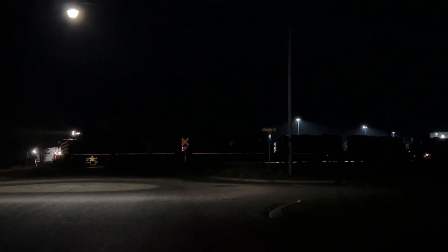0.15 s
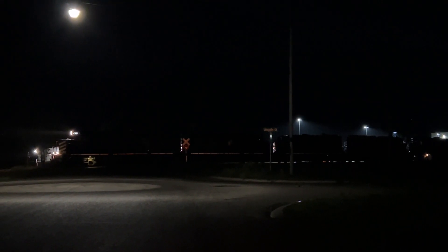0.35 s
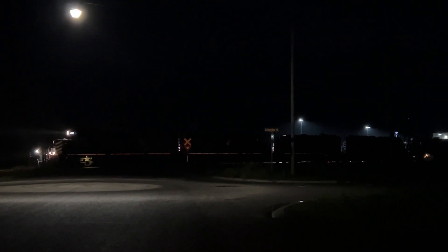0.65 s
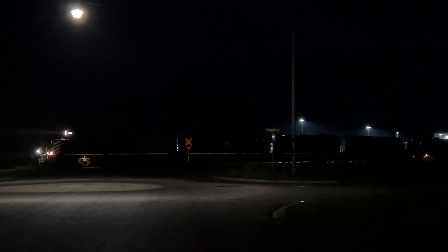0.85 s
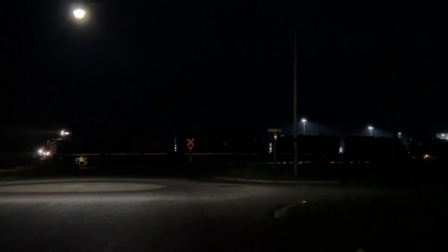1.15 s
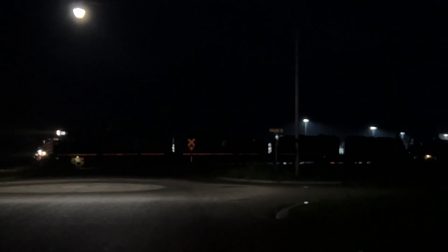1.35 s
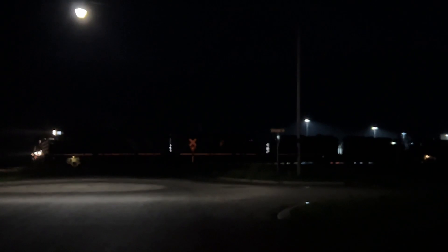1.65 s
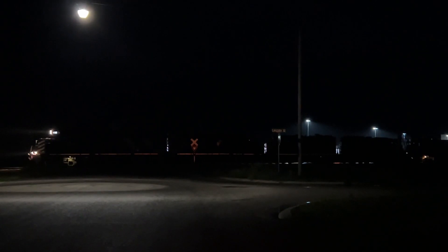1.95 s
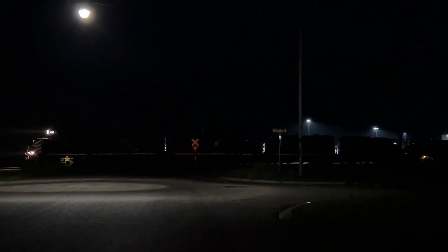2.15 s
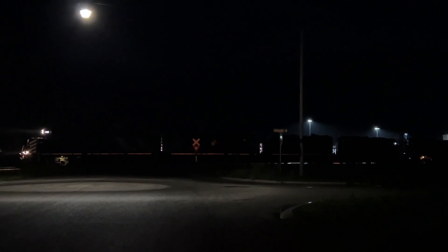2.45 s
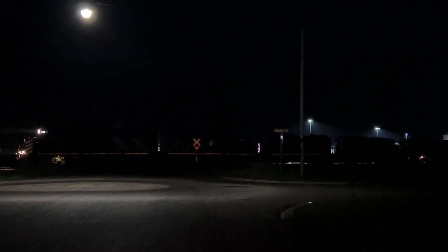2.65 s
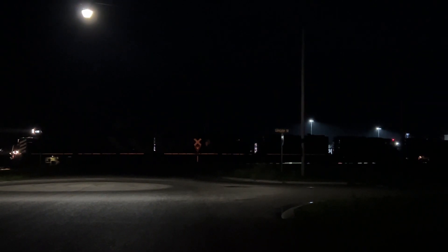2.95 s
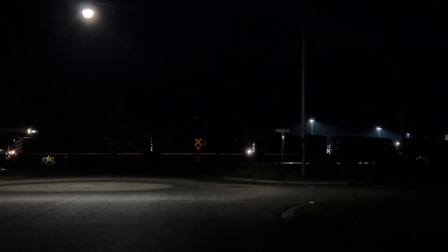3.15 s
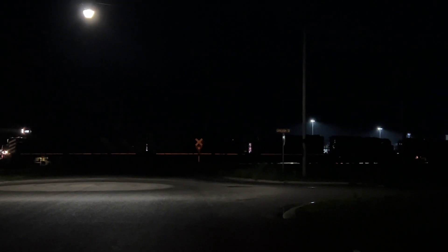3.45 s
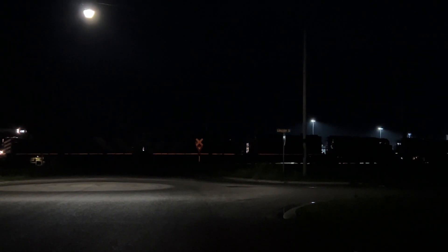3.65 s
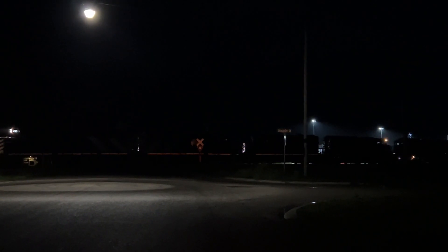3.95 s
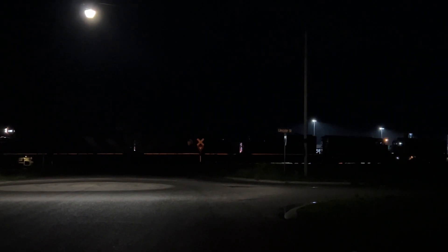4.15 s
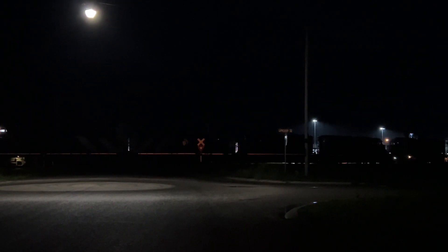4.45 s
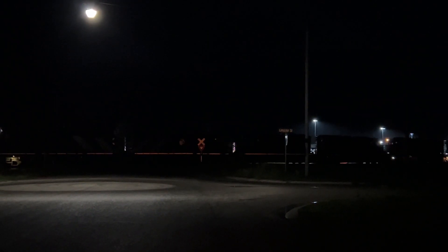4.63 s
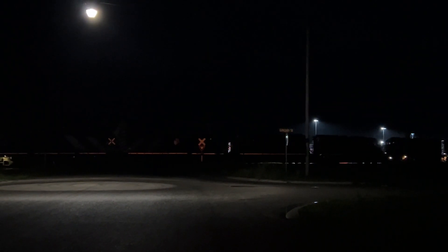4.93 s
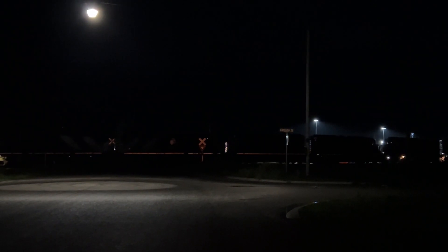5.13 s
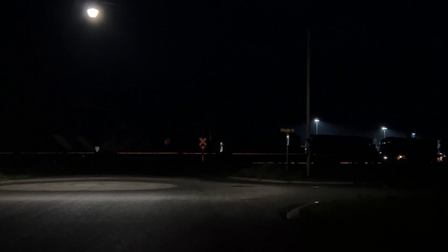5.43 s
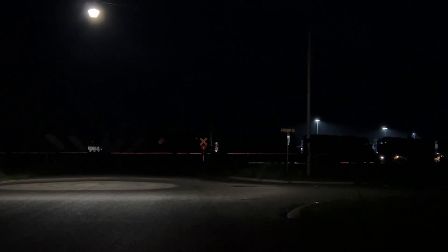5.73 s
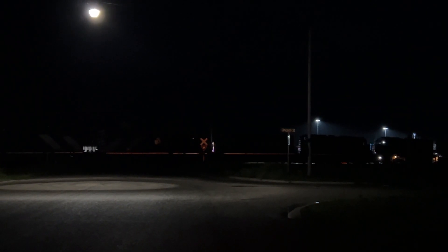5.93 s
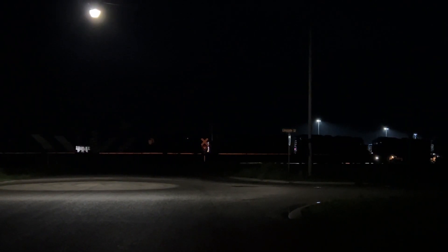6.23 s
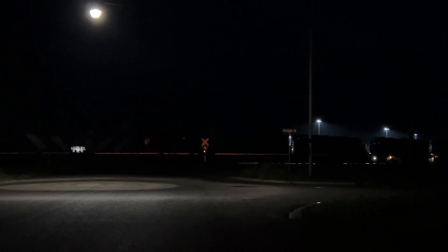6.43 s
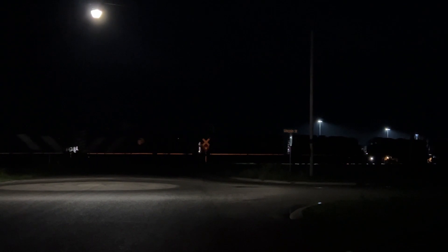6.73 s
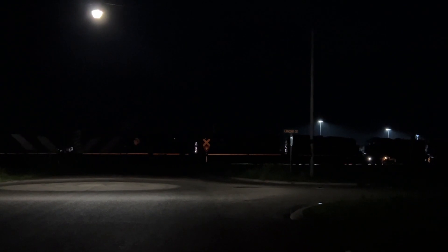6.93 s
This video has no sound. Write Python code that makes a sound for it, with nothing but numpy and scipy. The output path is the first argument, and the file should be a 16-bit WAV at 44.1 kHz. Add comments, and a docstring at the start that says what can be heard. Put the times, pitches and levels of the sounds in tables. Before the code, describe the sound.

A freight train passes over a night-time road crossing, heard in the open from some distance by a phone in nearly centred stereo. From 0 to about 4 s two diesel locomotives pull under load; their deep, uneven exhausts pulse around eight cycles a second and slowly beat against each other. Above them lie a wavering hum, fluttering gear whine, faint whistles and a noisy, airy blower whine near 6 to 7 kHz. Rail rumble, midrange roar and hiss flicker throughout. Soft, short wheel knocks come near 1.1, 2.3, 4.9 and 5.8 s. At about 4.4 s the throttle closes: every engine pitch sags steadily, by over a quarter by the end, and the exhausts thin and die away, while gear whine flickers through and low thudding strengthens around 5.6 s. The hiss eases after 6 s. From about 6.5 s a steady low drone near 88 Hz swells until the end at 7 s.

```python
"""Two coupled diesel locomotives pull a freight train over a crossing at night, some way from a phone.
At first their uneven exhausts throb and beat against each other under load, with gear and blower whine.
Wheels roar on the rails all along, as flickering noise, and four times knock over a joint.
After about four seconds the throttle closes: every engine pitch sags and the exhausts die away.
Near the end a low steady drone swells."""
import sys
import numpy as np
from scipy import signal
from scipy.fft import rfft, irfft
from scipy.io import wavfile
from scipy.ndimage import uniform_filter1d

SR = 44100
rng = np.random.default_rng(int(sys.argv[2]) if len(sys.argv) > 2 else 0)


def master(y):
    """Save y as 16-bit WAV."""
    cut = np.clip(np.atleast_2d(y).T, -1, 1)
    pcm = np.round(cut * 32767)  # scale
    wavfile.write(sys.argv[1], SR, pcm.astype(np.int16))


N = 312228  # samples, 7.08 s

LEAD_CRANK, TRAIL_CRANK = -.030, -.040  # engine cycles at the start


def undb(db):
    """Decibels to an amplitude factor."""
    return 10 ** (np.asarray(db) / 20)


def level(x, db):
    """Scale a signal to an rms level in dB."""
    return x * undb(db) / np.sqrt(np.mean(x ** 2))


def curves(table):
    """Columns after the time column, as one value per sample."""
    s, *columns = np.transpose(table)
    return [np.interp(np.arange(N) / SR, s, c) for c in columns]


def curve(table):
    """The first column after the time column, as one value per sample."""
    return curves(table)[0]


def along(table, x):
    """A table of (frequency or order, dB) read on a log axis."""
    return np.interp(np.log(x), np.log(np.array(table)[:, 0]), np.array(table)[:, 1])


def walk(rate):
    """Random levels held 1 / rate s and slewed twice; spread near 1."""
    hold = int(SR / rate)
    steps = np.repeat(rng.standard_normal(N // hold + 1), hold)
    slewed = uniform_filter1d(uniform_filter1d(steps, hold), hold)
    return 1.66 * slewed[:N]


def sine(hz):
    """A sine of moving pitch; rms 1."""
    return np.sqrt(2) * np.sin(2 * np.pi * np.cumsum(hz) / SR)


def smooth_noise(width_hz):
    """Complex noise that wanders within a band around zero."""
    sos = signal.butter(2, width_hz / 2, fs=SR, output="sos")
    re, im = signal.sosfilt(sos, rng.standard_normal((2, N)))
    return level(re, 0) + 1j * level(im, 0)


def smear(hz, width_hz):
    """A band of noise around a moving centre; rms near 1."""
    return (smooth_noise(width_hz) * np.exp(2j * np.pi * np.cumsum(hz) / SR)).real


def tone(hz, db, waver_db, skirt_db, skirt_share, rate=12.0):
    """A wavering sine; its scattered echoes come back lower, as a skirt of noise just under it."""
    clean = undb(waver_db * walk(rate)) * sine(hz)
    skirt = smear((1 - skirt_share / 2) * hz, skirt_share * hz[0])
    return undb(db) * clean + undb(skirt_db) * skirt


def colour(spectrum, flicker_db, rate, count):
    """Noise of a given spectrum, cut in bands that each flicker alone; rms 1."""
    hz = np.fft.rfftfreq(N, 1 / SR).clip(1)
    full = rfft(rng.standard_normal(N)) * undb(along(spectrum, hz))
    edges = np.geomspace(spectrum[0][0], spectrum[-1][0], count + 1)
    total = 0
    for low, high in zip(edges, edges[1:]):
        band = irfft(full * (hz >= low) * (hz < high), N)
        total = total + band * undb(flicker_db * walk(rate))
    return level(total, 0)


def exhaust(hz, load, cylinders, crank, upper, throb_db):
    """Unequal cylinders repeat once a cycle; the silencer passes mostly the middle orders of that pattern."""
    # what the silencer passes: order (per engine cycle), gain_db
    silencer = [(5, -28), (6, -19.5), (7, -15.5), (8, 2), (15, 4)]
    # with the fuel cut two orders linger above the rest: time_s, order_8_db, order_13_db
    linger = [(0, -0.5, -1), (5.4, 1, 0), (5.8, 3.5, 3.5), (6.2, 4.5, 11), (6.6, 3, 3), (7.08, 11, 11.5)]
    # upper orders against the exhaust: time_s, level_db
    upper_level = [(0, -1.5), (1, -3), (2, -2), (3, -0.9), (3.9, -1), (4.4, 0), (4.8, 4), (5.5, 2.5),
                   (6.2, 1.5), (7.08, 1.5)]
    pipe_spread_orders = 11  # the pipe delays the edge by one cycle over this many orders

    load_db, bright_db = curves(load)
    linger_db = dict(zip((8, 13), curves(linger)))
    turn = np.exp(2j * np.pi * (crank + np.cumsum(hz) / SR))
    pattern = np.fft.fft(cylinders)
    pattern = pattern * np.sqrt(2 / np.sum(np.abs(pattern[8:]) ** 2))

    body, spin = 0, turn ** 4
    for order in range(5, 16):
        spin = spin * turn
        gain_db = along(silencer, order) + bright_db * max(order - 8, 0) + linger_db.get(order, 0)
        body = body + undb(gain_db) * (pattern[order] * spin).real

    edge = 0  # the sharp edge of each puff
    for order, order_db in enumerate(upper, 16):
        spin = spin * turn
        pipe_delay = np.exp(-1j * np.pi * order ** 2 / pipe_spread_orders)
        edge = edge + undb(order_db) * (spin * pipe_delay).real
    edge_db = curve(upper_level) + throb_db + .5 * walk(6)
    return undb(load_db) * (body + undb(edge_db) * edge)


def throb(hz):
    """Level swing in dB of what the trailing engine shakes, repeating once an engine cycle."""
    # swing in sixteenths of the cycle: swing_db
    cycle_swing = [2, 2, 3.5, 2.5, -2, .5, 0, -1.5, -4, -3, -4, -3, -1.5, 0, 0, 1]
    # how much of the swing is heard: time_s, share (0-1)
    swing_depth = [(0, 0.76), (5.4, 0.94), (6, 0.21), (7.08, .3)]
    turn = TRAIL_CRANK + np.cumsum(hz) / SR
    return curve(swing_depth) * np.interp(turn, (np.arange(16) + .5) / 16, cycle_swing, period=1)


def engines(lead_hz, trail_hz, throb_db):
    """Two exhausts of slightly different speed beat against each other."""
    # each cylinder's puff against the mean, in firing order: puff (share of the largest)
    lead_cylinders = [-0.09, -0.39, -0.12, 0.2, -0.06, -0.6, 0.62, -0.73, 1.0, -0.26, 0.25, -0.2, 0.18,
                      0.37, 0.24, -0.41]
    trail_cylinders = [0.61, -0.33, 0.0, -0.32, 1.0, -0.97, 0.53, -0.13, 0.02, -0.35, 0.58, -0.5, -0.02,
                       -0.05, -0.36, 0.29]
    # each exhaust holds under load, then dies away: time_s, level_db, brightness_db_per_order
    lead_load = [(0, -16, -0.7), (1.399, -20.5, -1), (2.1, -18, -1), (3.5, -19, -0.54), (4.8, -17.5, -0.84),
                 (6.1, -30.5, 0.14), (7.08, -42.5, 4)]
    trail_load = [(0, -19.5, -4.5), (.7, -16, -1.5), (4.199, -16.5, -0.83), (4.7, -29, 2.5), (5.6, -25, 2),
                  (6.6, -27.5, -2), (7.08, -37, 4.5)]
    # the sharp edge of each puff: order (per engine cycle), lead_db, trail_db
    upper_orders = [(16, -15, -17), (17, -16, -20), (18, -20, -18), (19, -28, -27), (20, -19, -30),
                    (21, -26, -20), (22, -22, -22), (23, -26, -19), (24, -19, -21), (25, -23, -24),
                    (26, -28, -23), (27, -27, -25), (28, -41, -31), (29, -28, -35), (30, -26, -39),
                    (31, -31, -28), (32, -36, -24), (33, -30, -26), (34, -31, -24), (35, -30, -27),
                    (36, -27, -37), (37, -32, -26), (38, -32, -28), (39, -36, -26), (40, -36, -23),
                    (41, -32, -22), (42, -29, -23), (43, -39, -23), (44, -39, -31), (45, -42, -39),
                    (46, -36, -35), (47, -31, -32), (48, -38, -29), (49, -38, -35), (50, -36, -29),
                    (51, -37, -38), (52, -34, -35), (53, -34, -22), (54, -33, -39), (55, -36, -42),
                    (56, -35, -28), (57, -39, -35), (58, -27, -41)]
    _, lead_upper, trail_upper = np.transpose(upper_orders)
    lead = exhaust(lead_hz, lead_load, lead_cylinders, LEAD_CRANK, lead_upper, 0)
    trail = exhaust(trail_hz, trail_load, trail_cylinders, TRAIL_CRANK, trail_upper, throb_db)
    return lead + trail


def geared_speed(hz):
    """The geared whines start to sag ahead of the exhaust."""
    # speed against the engine's: time_s, ratio
    sag = [(0, 1), (3, .999), (3.7, .996), (4.2, .988), (4.5, .986), (4.75, .991), (5.3, .999), (5.8, .996),
           (6.3, .99), (7.08, .99)]
    return hz * curve(sag)


def shaft_tones(hz, geared):
    """Hum, fan, pump and whistles turn at fixed multiples of the engine cycle."""
    # level of each whine: time_s, level_db
    hum_level = [(0.0, -39.5), (0.5, -48), (0.75, -40), (1.35, -45), (1.5, -39), (2.1, -36.5), (3.1, -36),
                 (3.45, -33), (4.15, -40), (4.5, -37.5), (5.15, -52), (5.45, -60), (5.55, -42), (5.65, -35),
                 (5.85, -54), (5.95, -46), (6.1, -67), (6.25, -37), (6.35, -45), (7.05, -49.5)]
    fan_level = [(0, -51), (.2, -51), (.35, -45), (.7, -48), (1.1, -54), (1.4, -47), (1.8, -47), (2.3, -51),
                 (2.65, -59), (2.9, -53), (3.15, -53), (3.4, -59), (3.9, -55), (4.35, -53), (4.65, -62),
                 (5.1, -57), (5.5, -70), (7.08, -75)]
    pump_level = [(0, -53), (.25, -50), (.85, -51), (1.05, -56), (1.4, -55), (1.6, -60), (1.9, -55),
                  (2.3, -61), (2.75, -57), (3.05, -54), (3.65, -53), (4.45, -62), (4.9, -57), (5.1, -64),
                  (7.08, -76)]
    whistle_level = [(0, -55), (.3, -60), (.5, -54), (.7, -54), (1, -66), (1.5, -56), (1.8, -60),
                     (2.15, -66), (3.5, -64), (4.4, -64), (4.7, -64), (4.95, -58), (5.12, -66), (5.25, -58),
                     (5.42, -55), (5.55, -67), (5.7, -61), (5.95, -72), (7.08, -78)]
    upper_whistle_level = [(0, -62), (1, -69), (1.6, -69.5), (2.8, -64), (3.8, -65), (4.4, -74),
                           (7.08, -91)]
    fan, pump, whistle = curve(fan_level), curve(pump_level), curve(whistle_level)
    # the multiples are whines per engine cycle
    out = tone(79 * hz, curve(hum_level), 1.2, -51.5, .12)
    out = out + tone(201.5 * hz, fan, 0.71, fan - 6, .02, rate=30.)
    out = out + tone(282 * hz, pump, 1.3, pump - 9, 0.03, rate=21.0)
    out = out + tone(560 * geared, whistle, 2.0, whistle - 3, 0.012, rate=30.)
    return out + undb(curve(upper_whistle_level)) * smear(632 * hz, 25.)


def gear_mesh(geared):
    """The gear mesh tone and three overtones, swelling and fading as they travel to the phone."""
    # level of the mesh tone and its overtones: time_s, level_db
    mesh_level = [(0, -63), (1.55, -63), (2.55, -58), (3.1, -63), (3.3, -58), (3.75, -59), (4.15, -50),
                  (4.5, -57), (4.8, -52), (4.95, -60), (5.1, -49), (5.2, -62), (5.5, -56), (5.7, -65),
                  (6, -57), (6.2, -65), (6.65, -56), (7.08, -60)]
    twice_level = [(0, -57), (.5, -54), (1.55, -49), (1.9, -51), (2.1, -61), (2.7, -59), (2.85, -51),
                   (3.4, -58), (3.9, -52), (4.3, -58), (4.9, -66), (5.05, -47), (5.15, -55), (5.3, -45),
                   (5.45, -47), (5.55, -54), (5.8, -57), (5.95, -50), (6.05, -58), (6.15, -50), (6.33, -47),
                   (6.6, -62), (6.75, -51), (6.9, -63), (7.08, -52)]
    thrice_level = [(0, -62), (.3, -66), (.65, -56), (.9, -65), (1.7, -63), (1.9, -58), (2.2, -55),
                    (2.4, -58), (2.6, -55), (2.8, -57), (2.9, -52), (3.1, -61), (3.5, -60), (3.8, -51),
                    (4.1, -64), (4.4, -57), (4.5, -60), (4.72, -54), (4.8, -62), (4.93, -55), (5.1, -63),
                    (5.15, -51), (5.35, -52), (5.4, -61), (5.5, -55), (5.58, -67), (5.77, -54), (5.86, -56),
                    (5.92, -51), (5.99, -55), (6.05, -48), (6.15, -62), (6.2, -53), (6.25, -61),
                    (6.34, -51), (6.4, -61), (6.48, -53), (6.6, -64), (6.7, -58), (6.75, -64), (6.85, -55),
                    (7, -60), (7.08, -56)]
    fourfold_level = [(0.0, -72), (1.2, -65), (2.75, -72), (3.4, -68), (4.25, -72), (4.4, -67), (5.25, -72),
                      (5.4, -66), (5.6, -63), (5.7, -57), (5.78, -66), (5.95, -63), (6.1, -72), (7.05, -70)]
    mesh_hz = 145.5 * geared  # mesh tones per engine cycle
    mesh, fourfold = curve(mesh_level), curve(fourfold_level)
    out = tone(mesh_hz, mesh, 2.2, mesh - 6.5, 0.067, rate=24.0)
    out = out + tone(2 * mesh_hz, curve(twice_level), 2.3, -55.5, .22, rate=36.)
    out = out + tone(3 * mesh_hz, curve(thrice_level), 2.6, -60, .1, rate=30.)
    return out + tone(4 * mesh_hz, fourfold, 2.2, fourfold - 8, .02, rate=30.)


def blower(geared):
    """Turbulence smears the blade tone: a narrow core, a wide skirt, a clean line, two faint overtones."""
    # blade hiss that the core, tone and skirt follow: time_s, level_db
    blade_level = [(0, -50), (1.1, -49.5), (1.65, -46), (2.35, -48.5), (3.5, -43.5), (4.5, -46.5),
                   (5.7, -42.5), (6.15, -43), (6.4, -53), (7.08, -54.5)]
    # clean blade tone inside the hiss: time_s, level_db
    line_level = [(0, -60), (.9, -56), (1.7, -52), (2.25, -59), (2.6, -52), (2.95, -47), (3.4, -47),
                  (3.7, -49), (4.2, -50), (4.5, -58), (7.08, -66)]
    # overtones of the hiss: time_s, level_db
    twice_blade_level = [(0, -81.5), (4.4, -87), (4.9, -70), (5.4, -62.5), (6, -69.5), (6.6, -79),
                         (7.08, -91)]
    thrice_blade_level = [(0, -110), (5.6, -100), (6.3, -90), (6.55, -73), (6.8, -80), (7.08, -90)]
    blade_order, line_order, firing_order = 853, 855, 8  # per engine cycle
    skirt_fade_db = 39  # how far the skirt would sink if the blower slowed to a stop

    blade_hz = blade_order * geared
    blades = curve(blade_level)
    core = undb(blades - 1.5 + 1.3 * walk(40.)) * smear(.992 * blade_hz, 125)
    skirt_db = blades - 6 - skirt_fade_db * (1 - geared / geared.max())
    skirted_tone = tone(blade_hz, blades - 14, 5.3, skirt_db, 0.055, rate=41.0)

    flutter = 1 + .55 * np.sin(2 * np.pi * np.cumsum(firing_order * geared) / SR)
    line_db = curve(line_level) + 0.75 * walk(14.)
    line = undb(line_db) * flutter * sine(line_order * geared)

    twice = undb(curve(twice_blade_level)) * smear(1.97 * blade_hz, 400.)
    thrice = undb(curve(thrice_blade_level)) * smear(2.96 * blade_hz, 300.)
    return core + skirted_tone + line + twice + thrice


def rolling(throb_db):
    """Four layers of flickering noise from the rolling train, the low two throbbing with the engine, and above
    them a faint flickering top noise."""
    # levels of the layers: time_s, thud_db, rumble_db, roar_db, hiss_db, top_db
    roll_levels = [(0, -36, -29, -40.5, -44.5, -64.5), (.73, -30.5, -29, -40.5, -44.5, -60.5),
                   (1.73, -31, -28, -40.5, -44, -61), (3, -33.5, -27.5, -39.5, -44, -58.5),
                   (4.47, -35.5, -25, -39.5, -43.5, -56.5), (4.83, -33, -26, -40.5, -46, -59.5),
                   (5.6, -24, -28, -40.5, -47.5, -61), (6.2, -28, -27, -40.5, -49, -62.5),
                   (7.08, -26.5, -29, -44, -52.5, -66.5)]
    # spectrum of each layer, before levelling: frequency_hz, density_db (per Hz)
    thud_spectrum = [(25, -33), (45, 0.5), (70, -3), (110, -2.5), (170, -2.5), (240, -13.5), (320, -41)]
    rumble_spectrum = [(20, -35.5), (40, -15.5), (60, -13), (100, -18.5), (135, -12), (155, -15),
                       (175, -14), (240, -15), (325, -10), (365, -16), (420, -13.5), (540, -19.5),
                       (700, -28.5), (900, -61)]
    roar_spectrum = [(350, -20.5), (600, -4.5), (648, 0.5), (766, -3.5), (1030, -10), (1160, -11),
                     (1320, -14), (1570, -13.5), (1880, -14.5), (2040, -13.5), (2500, -49), (3250, -52.5),
                     (5500, -120)]
    hiss_spectrum = [(1290, -11), (2200, -2.5), (2320, -7), (2440, -7), (3380, -9.5), (4210, -15),
                     (4480, -14), (6010, -15.5), (6400, -14), (8320, -24.5), (14100, -120)]
    # faint top noise, with narrow gaps near 10 and 14 kHz: frequency_hz, density_db (per Hz)
    top_spectrum = [(5000, -13), (6000, -2.5), (7000, -8), (8000, -7), (9000, -9.5), (9600, -14),
                    (10200, -48.5), (10900, -17), (12000, -13), (13300, -17), (13800, -47), (15500, -57.5)]
    thud, rumble, roar, hiss, top = curves(roll_levels)
    out = undb(thud + throb_db) * colour(thud_spectrum, 0.54, 15, count=4)
    out = out + undb(rumble + 0.45 * throb_db) * colour(rumble_spectrum, 0.9, 19, count=10)
    out = out + undb(roar) * colour(roar_spectrum, 0.28, 10, count=6)
    out = out + undb(hiss) * colour(hiss_spectrum, 0.47, 16, count=5)
    return out + undb(top) * colour(top_spectrum, 2.0, 35, count=4)


def joints():
    """Each wheel clatters briefly on the joint and rings the modes of rail and wheel."""
    # short soft clatters: start_s, length_s, level_db, brightness_db_per_octave
    joint_knocks = [(1.101, .016, -35, 3), (2.275, .022, -37, -2), (4.940, .026, -31, -4),
                    (5.784, .018, -34, -2)]
    # modes of rail and wheel: frequency_hz, below_strongest_db, t60_s
    joint_modes = [(560, 2, .016), (760, 1, .012), (980, 2, .01), (1200, 2, .01), (1600, 12, .008),
                   (2100, 13, .007), (3000, 12, .006)]
    rise_s, t60_s = .004, .05  # of the clatter itself
    age = np.arange(SR // 8) / SR
    out = np.zeros(N)
    for start_s, length_s, db, tilt_db in joint_knocks:
        ring = 0
        for k, (hz, below_db, mode_t60_s) in enumerate(joint_modes):
            mode_db = tilt_db * np.log2(hz / 1000) - below_db - 60 * age / mode_t60_s
            ring = ring + (-1) ** k * undb(mode_db) * np.sin(2 * np.pi * hz * age)
        push = np.minimum(age / rise_s, 1) * undb(-60 * np.maximum(age - length_s, 0) / t60_s)
        grit = rng.standard_normal(len(age))
        knock = signal.fftconvolve(push * grit, ring / np.linalg.norm(ring))[:len(age)]
        start = int(start_s * SR)
        out[start:start + len(age)] += undb(db) * knock
    return out


def drone():
    """A low steady tone that swells near the end."""
    # time_s, pitch_hz, level_db
    drone_swell = [(0, 88, -70), (6.3, 88, -60), (6.7, 89, -30), (6.95, 88, -22), (7.08, 88, -21)]
    hz, db = curves(drone_swell)
    return undb(db) * sine(hz)


def scattered(train):
    """The share of the sound that differs between the ports, through a noise tail falling 60 dB in 80 ms."""
    # side share against the direct sound: frequency_hz, share_db
    diffuse = [(60, -47), (300, -29.5), (900, -12.5), (1600, -11), (2300, -32), (3800, -5.5), (6400, -46.5),
               (9000, -1.5), (14000, 1)]
    size = int(.08 * SR)
    tail = rng.standard_normal(size) * undb(-60 * np.arange(size) / size)
    tail = level(tail, 0) / np.sqrt(size)  # unit energy
    hz = np.fft.rfftfreq(N, 1 / SR).clip(1)
    return irfft(rfft(train) * rfft(tail, N) * undb(along(diffuse, hz)), N)


def scene():
    """All comes from afar as nearly one wave; a scattered share differs between the ports."""
    # engine speeds, nearly steady until the throttle closes: time_s, lead_hz, trail_hz (cycles a second)
    speed = [(0.0, 8.075, 7.948), (0.7, 8.05, 7.989), (1.4, 8.04, 7.966), (2.1, 8.024, 7.966),
             (2.8, 8.028, 7.964), (3.5, 8.012, 7.958), (4.1, 7.952, 7.966), (4.35, 7.941, 7.964),
             (4.7, 7.716, 7.738), (5.1, 7.452, 7.433), (5.6, 7.102, 7.081), (6.1, 6.628, 6.602),
             (6.6, 6.222, 6.192), (7.08, 5.697, 5.742)]
    lead_hz, trail_hz = curves(speed)
    throb_db = throb(trail_hz)
    geared = geared_speed(trail_hz)
    train = engines(lead_hz, trail_hz, throb_db)
    train = train + shaft_tones(trail_hz, geared) + gear_mesh(geared) + blower(geared)
    train = train + rolling(throb_db) + joints() + drone()
    side = scattered(train)
    return np.array([train + side, train - side])


def record(dry):
    """The phone's two ports differ in gain and phase; the loudest beats are rounded and the top is cut."""
    # left port minus right: frequency_hz, difference_db
    ports_gain = [(60, 1.5), (140, 1.8), (200, 2.4), (400, 1), (565, 2.2), (880, 6), (1600, 1.3), (2300, 0),
                  (7500, 0)]
    # left port leads right: frequency_hz, lead_rad
    ports_phase = [(0, .1), (200, .12), (280, .02), (690, .33), (1120, -.2), (1700, -.25), (3270, .65),
                   (4500, .42), (6400, .06), (9000, 0)]
    hz = np.fft.rfftfreq(N, 1 / SR)
    half_gain = undb(along(ports_gain, hz.clip(1)) / 2)
    half = half_gain * np.exp(.5j * np.interp(hz, *np.transpose(ports_phase)))
    ports = irfft(rfft(dry) * np.array([half, 1 / half]), N)
    rounded = 1.3 * np.tanh(ports / 1.3)
    top_cut = signal.ellip(8, .2, 70, 15700, fs=SR, output="sos")  # low-pass at 15.7 kHz
    return signal.sosfilt(top_cut, rounded)


dry = scene()
out = record(dry)
master(out)
```